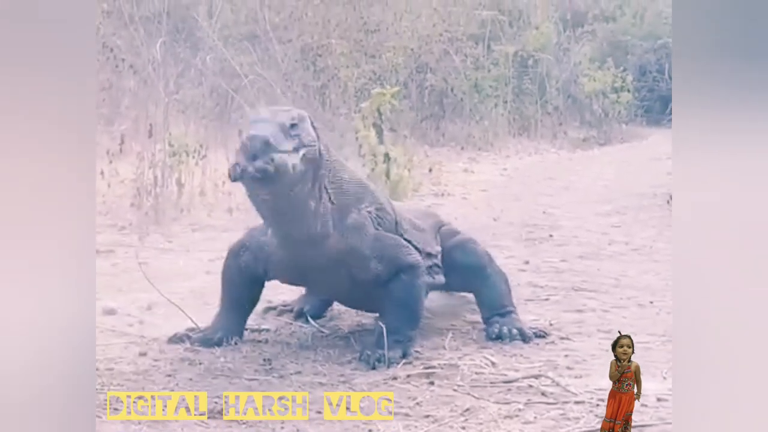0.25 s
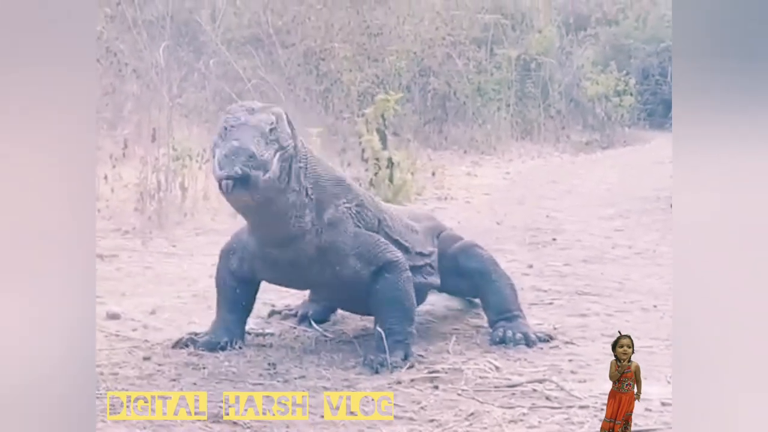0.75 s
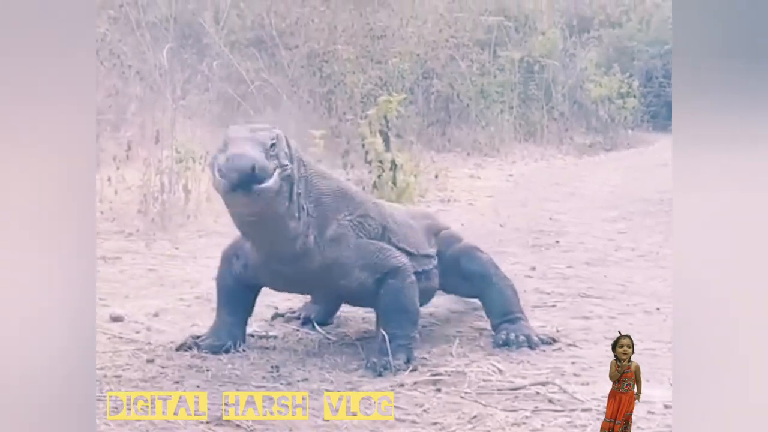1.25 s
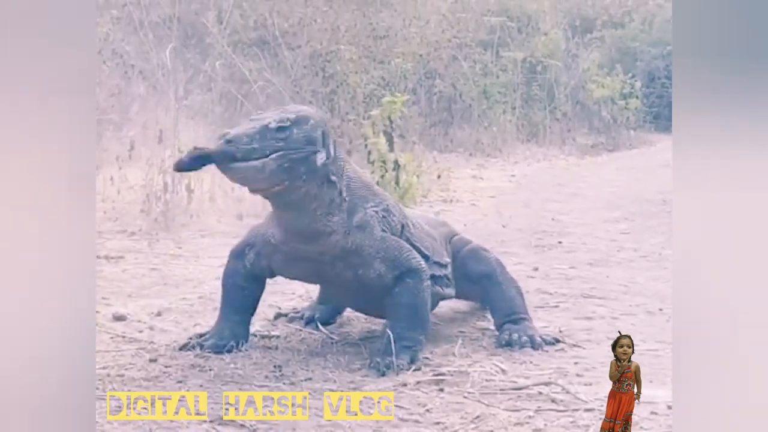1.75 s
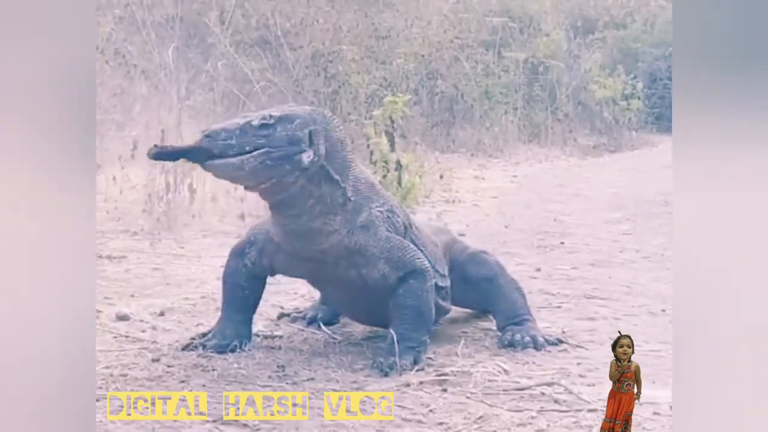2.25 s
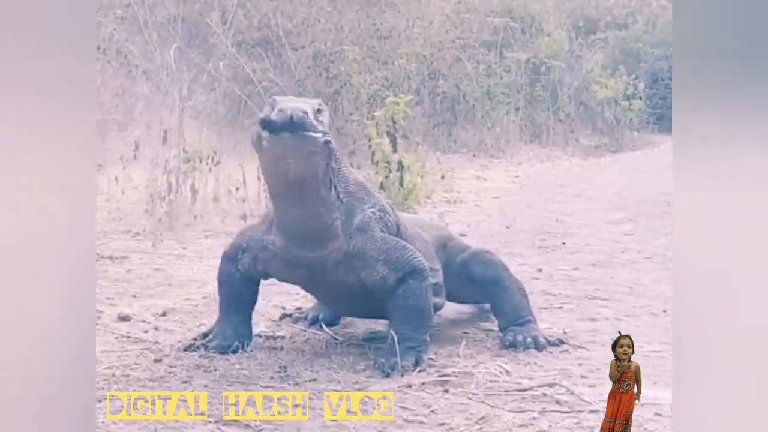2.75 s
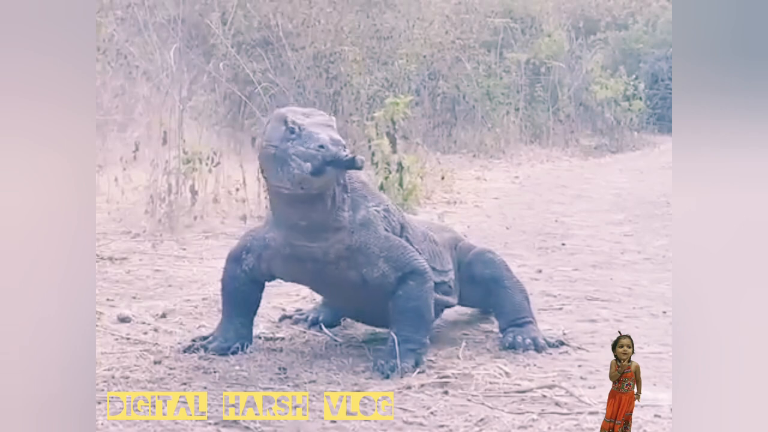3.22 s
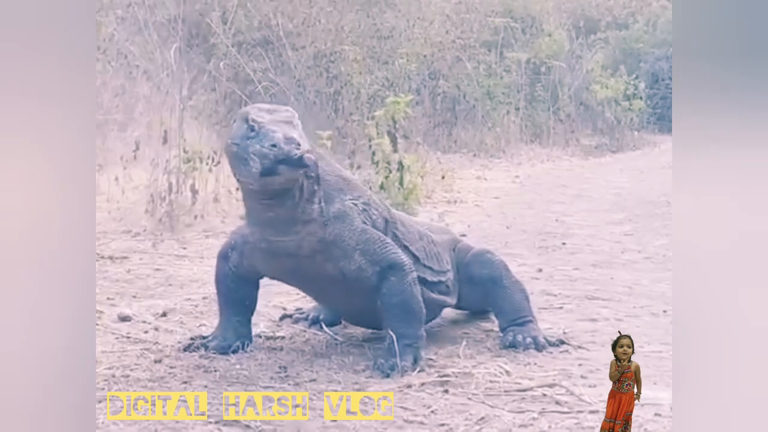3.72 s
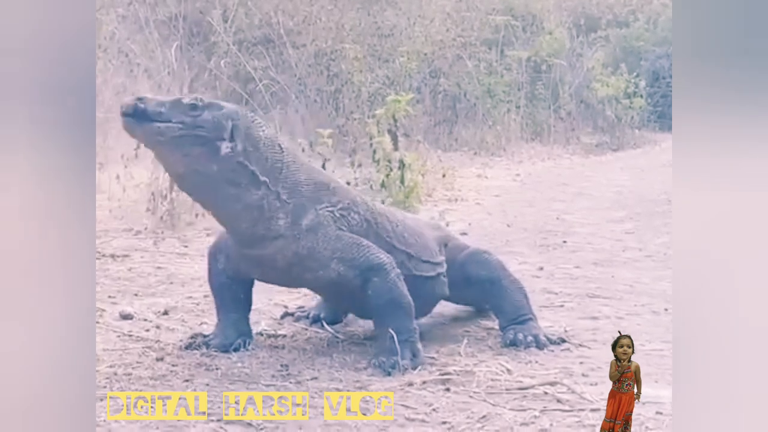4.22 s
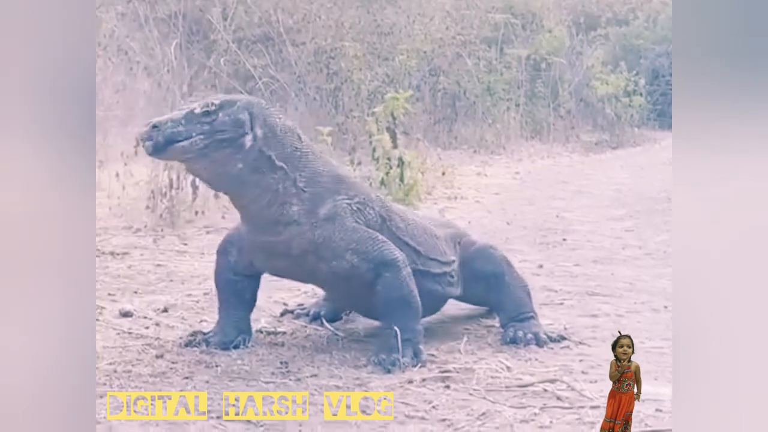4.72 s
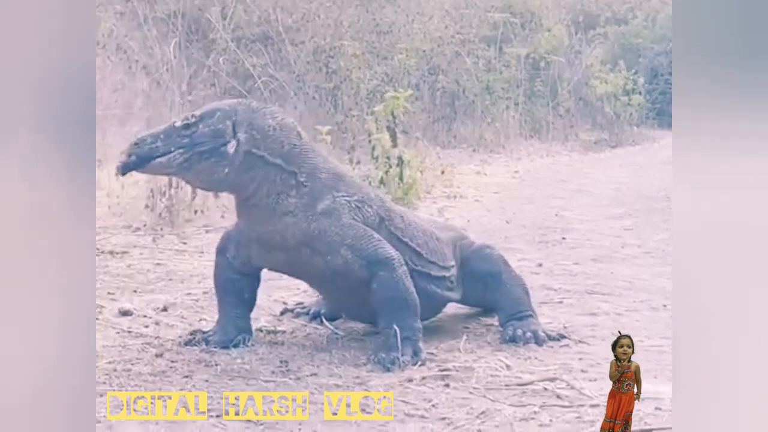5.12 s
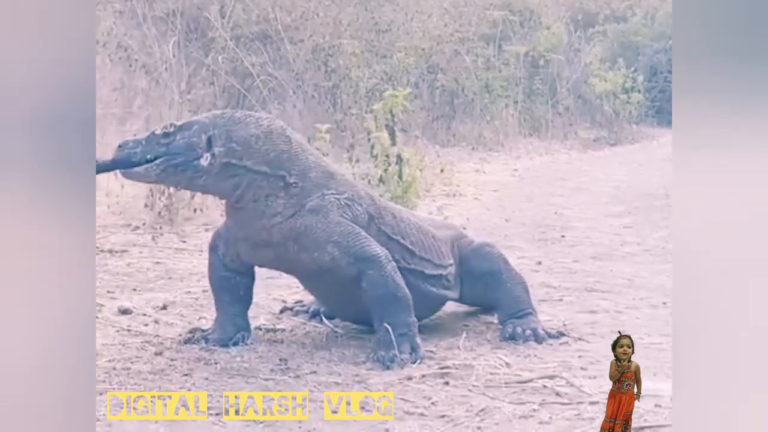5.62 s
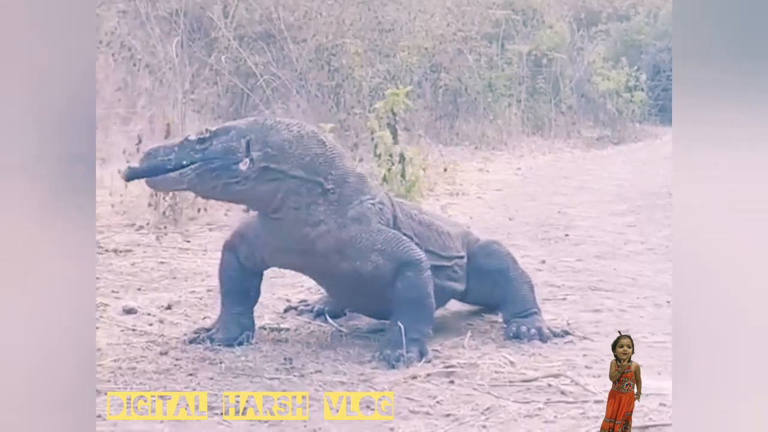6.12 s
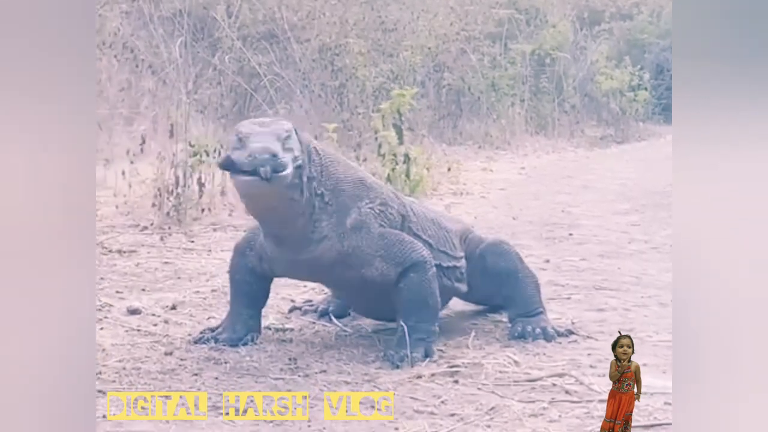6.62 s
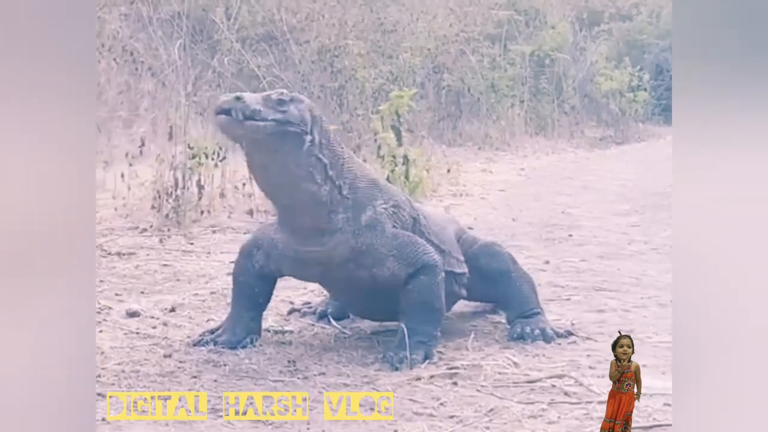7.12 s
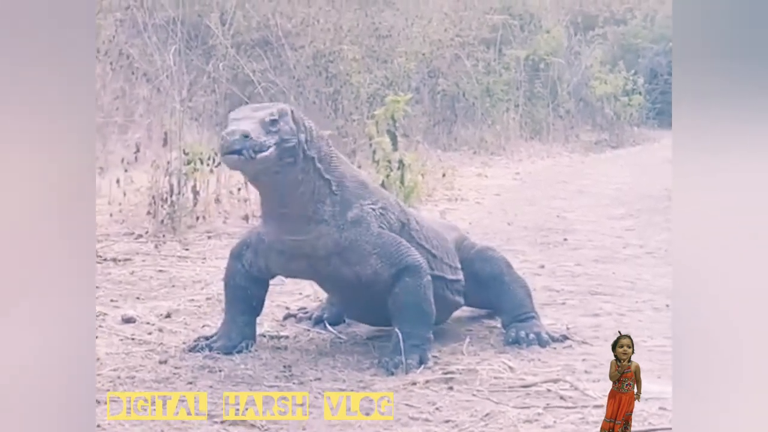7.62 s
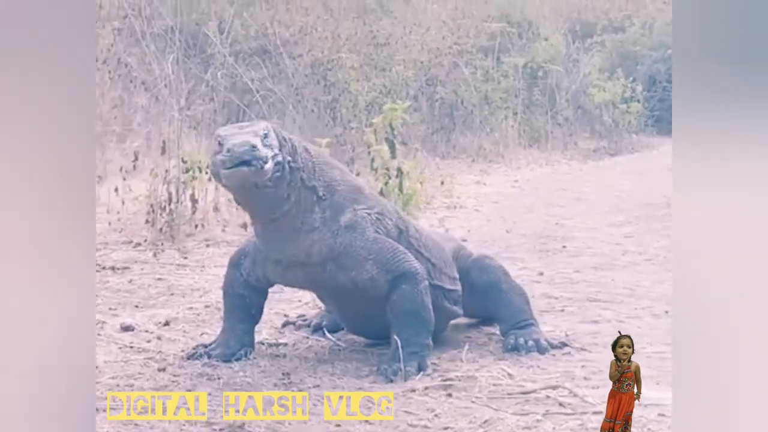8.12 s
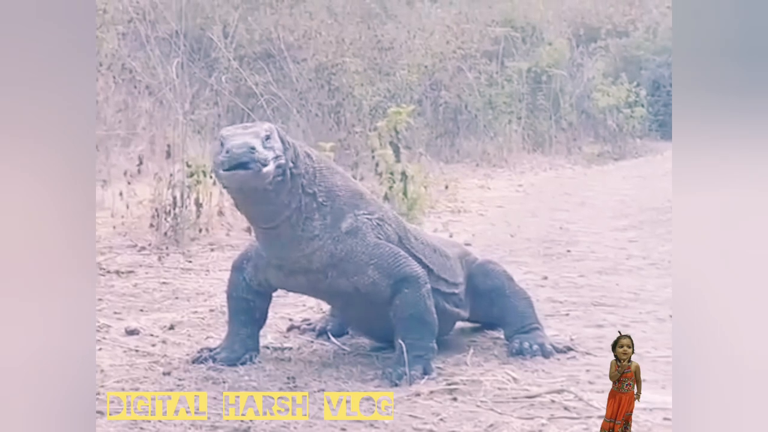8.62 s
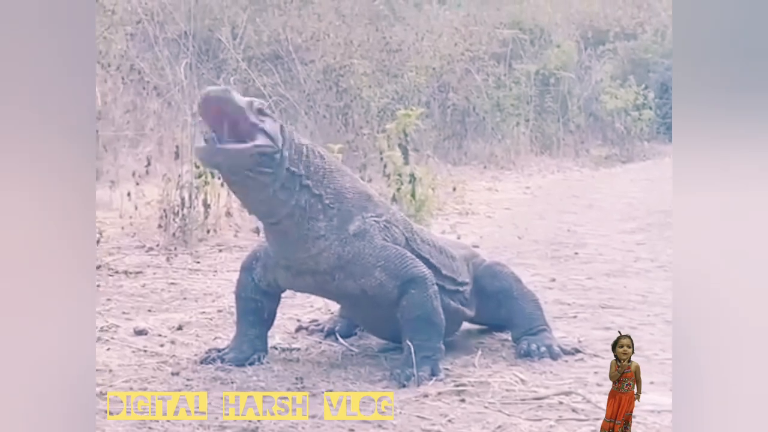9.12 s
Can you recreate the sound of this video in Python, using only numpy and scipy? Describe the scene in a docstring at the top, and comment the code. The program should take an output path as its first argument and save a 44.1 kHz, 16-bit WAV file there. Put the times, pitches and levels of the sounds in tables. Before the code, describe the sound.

The stretch opens mid-cry: a young goat's thin, high bleat drops in pitch within 0.13 s. Dry litter rustles close by with small clicking ticks. From 0.6 to 1.2 s comes the strongest bleat, squeaky at its start and slightly rough; at 0.75 s a stick snaps sharply, with a faint low thump and bright, dense echoes fading away. Short broken cries follow at 1.5-1.8 s amid rustles and a strong tick near 1.9. A weak rising cry runs 2.8-3.3 s as mains hum and dull air rush become stronger and stay. Another bleat leaps up, then sinks, at 4.2-4.8 s. A tiny far bird chirps near 5 and around 8 s. Soft, lower bleats come at 6.4-6.9, 7.3-7.8 and 8.4-8.8 s. Dry scuffs sound at 8.3 and 9.05 s; a smooth hiss swells at 8.75 and fades by 9. Small, slightly hissy stereo microphone outdoors.

```python
"""Young goat bleating near dry litter

A young goat bleats in thin, high cries that weaken, as harmonics shaped by mouth and throat resonances.
Close by, dry litter ticks (short rings) and rustles (grainy noise), and one stick snaps with a bright echo.
A far bird chirps in gliding whistles; late on, a soft hiss of smooth noise swells and fades.
The small two-port microphone also hears mains hum and a dull rush of air, both stronger after about 3 s."""
import sys
import numpy as np
from scipy import signal
from scipy.fft import rfft, irfft, next_fast_len
from scipy.io import wavfile
from scipy.ndimage import uniform_filter1d

SR = 44100
rng = np.random.default_rng(int(sys.argv[2]) if len(sys.argv) > 2 else 0)


def file_out(sig):
    """Save sig as 16-bit WAV at sys.argv[1]."""
    # one column per channel
    cols = np.atleast_2d(sig).T
    # limit, then scale
    lim = np.clip(cols, -1, 1)
    pcm = np.round(lim * 32767).astype(np.int16)
    wavfile.write(sys.argv[1], SR, pcm)


def gain_from_decibels(decibels):
    """Convert decibel values to linear amplitude factors."""
    exponent = np.asarray(decibels, float) / 20
    return 10 ** exponent


N = 412313

# Background hum, low rumble and air rush, one row each. Each row: level before in dB, level after in dB,
# start of the change in seconds, end in seconds. The rush has its times reversed: it steps up at the second.
ROOM_TONE = [(-66, -53, 3.46, 3.83), (-70.5, -59, 2.78, 3.68), (-56.5, -54, 3.24, 3)]
# Harmonics of the mains hum. Each row: multiple of the hum pitch, level in dB.
HUM_ORDERS = [(1, -3), (2, -13), (3, -15), (4, -18.5), (5, -22.5), (6, -20.5)]
# Colour of the air rush. Each row: frequency in Hz, density in dB per Hz.
RUSH_COLOUR = [(47, -33), (80, -4), (123, 1), (146, -7), (233, -7), (603, -13.5), (1010, -20.5),
               (1800, -39.5), (2340, -69.5), (3960, -120)]
# Colour of the microphone's own hiss. Each row: frequency in Hz, density in dB per Hz.
MIC_HISS_COLOUR = [(940, -33.5), (1600, -17), (1880, -2.5), (2260, -3), (3130, -8.5), (7700, -11.5),
                   (9420, -24), (10900, -19.5), (15800, -23.5)]
# The two microphone ports in diffuse sound. Each row: frequency in Hz, side minus mid in dB.
DIFFUSE_PORTS = [(60, -23.5), (150, -8), (380, -11.5), (950, -7.5), (2380, 0), (5980, -29.5), (15000, -4.5)]
# The two microphone ports in the foreground sounds. Each row: frequency in Hz, side minus mid in dB.
NEAR_PORTS = [(60, -23), (250, -12.5), (700, -15.5), (1290, -1), (2380, -17), (4400, -34), (8120, -5.5),
              (15000, -17.5)]

# Far bird chirps. Each row: start in seconds, length in seconds, start pitch in Hz, end pitch in Hz, level in dB.
CHIRPS = [(4.95, .17, 3550, 4100, -86), (7.965, .03, 4200, 3200, -76), (8.175, .035, 4200, 3600, -81)]

# Litter rustle swells. Each row: peak time in seconds, peak level in dB, rise and fall in seconds per 20 dB.
RUSTLE = [(0.14, -71, 0.086, 0.26), (0.42, -64, 0.24, 0.57), (1.2, -69.5, 0.14, 0.52),
          (1.56, -63.5, 0.087, 0.053), (1.885, -67, 0.06, 0.26), (2.7, -68, 0.41, 0.11),
          (4.11, -74.5, 0.023, 0.13), (4.26, -69, 0.33, 0.091), (4.62, -78, 0.22, 0.54), (6.8, -76, .6, 1),
          (7.67, -77.5, 0.17, 0.91), (8.41, -70.5, 0.13, 0.12), (9.045, -68.5, 0.069, 0.46)]
# Colour of the litter. Each row: frequency in Hz, density in dB per Hz.
LITTER_COLOUR = [(880, -0.5), (1500, -1.5), (2170, 2), (4800, -4.5), (9510, -12), (13400, -23),
                 (15500, -38)]
# Short dull scuffs. Each row: peak time in seconds, peak level in dB, rise and fall in seconds per 20 dB.
SCUFFS = [(8.262, -56, 0.038, 0.073), (9.048, -56.5, 0.0056, 0.031)]
# Colour of the scuffs. Each row: frequency in Hz, density in dB per Hz.
SCUFF_COLOUR = [(900, -20), (1400, -0.5), (1900, 5.5), (2500, -3.5), (3200, -4), (6000, -20), (15000, -48)]
# Thin bright rustles, as of dry grass. Each row: peak time in seconds, peak level in dB,
# rise and fall in seconds per 20 dB.
GRASS = [(1.19, -74, .25, 0.22), (1.55, -68.5, 0.035, 0.32), (2.385, -74.5, .02, 0.04)]
# Colour of the grassy rustles. Each row: frequency in Hz, density in dB per Hz.
GRASS_COLOUR = [(4000, -19), (8000, 2.5), (15000, -3)]
# Level curve of the long soft hiss. Each row: time in seconds, level in dB.
LONG_HISS = [(8.52, -81), (8.746, -57.5), (8.876, -59.5), (9.0, -71)]
# Colour of the long hiss. Each row: frequency in Hz, density in dB per Hz.
LONG_HISS_COLOUR = [(880, -7), (1500, -1.5), (2400, -0.5), (4200, -6.5), (5670, -13), (7210, -9),
                    (8180, -14), (15000, -30.5)]

# The clearest litter ticks. Each row: start in seconds, strength in dB, ringing pitch in Hz,
# crack over the ring in dB.
TICKS = [(0.2035, -42, 2580, -21), (0.3546, -41, 2640, -16), (0.4196, -42.5, 2200, -2.5),
         (0.5796, -33, 2190, -4.5), (1.433, -51, 2300, -2), (1.537, -42.5, 7600, -1.5),
         (1.76, -33.5, 1420, -18.5), (1.8678, -26.5, 2430, -12), (1.994, -49, 2610, -10),
         (2.061, -52, 2680, -1.5), (2.178, -55, 3000, 0), (2.7173, -32.5, 3320, -12),
         (2.749, -31.5, 2500, -10.5), (2.809, -45, 3000, -17), (2.8386, -48, 2820, -0.5),
         (3.088, -50, 4500, -9.5), (3.9824, -45, 3250, -7), (4.1634, -43, 1790, -20),
         (7.664, -47, 4740, -13), (7.6849, -42.5, 3120, -23), (7.732, -44, 1800, -22)]

# The snap and its splinters. Each row: peak time in seconds, relative burst strength in dB.
SNAP = [(.7484, -2), (.7512, -15), (.7575, -25), (.7612, -22), (.7635, -19)]
# Brief modes of the stick. Each row: frequency in Hz, relative strength in dB, 60 dB decay in seconds.
STICK_MODES = [(3400, -22, 0.00075), (4800, -7.5, 0.0014), (5752, 1.5, 0.0029), (6800, -4.5, .002),
               (8000, -6.5, .002), (9600, -6.5, 0.004), (12600, -15, 0.0011)]
# Low thump after the snap. One row: start in seconds, frequency in Hz, strength in dB before its soft onset,
# 60 dB decay in seconds.
THUMP = (.7512, 205, -30, .05)
# Colour of the snap's echoes. Each row: frequency in Hz, density in dB per Hz.
ECHO_COLOUR = [(2500, -26), (5000, -7), (7500, 0.5), (11000, -6), (15000, -9.5)]

# One short curve per held note of the goat. Each row: time in seconds, pitch in Hz, mouth resonance level in dB,
# mouth resonance in Hz, upper throat level in dB.
NOTES = [
    [(0.0, 874, -53.5, 2100, -53), (0.06, 842, -51.5, 2230, -58), (0.105, 797, -51, 2040, -68),
     (0.13, 650, -53, 1740, -78)],
    [(0.59, 736, -59, 1800, -65), (0.72, 910, -50.5, 1900, -61.5), (0.78, 979, -56, 2010, -78),
     (0.915, 882, -44.5, 1740, -55), (1.05, 829, -45, 2030, -50.5), (1.102, 833, -41.5, 2050, -54),
     (1.122, 875, -48.5, 2280, -45), (1.172, 796, -51, 1860, -62)],
    [(1.168, 532, -50, 2180, -56), (1.215, 460, -62, 2000, -70)],
    [(1.48, 503, -74, 2190, -93), (1.515, 563, -54, 2250, -76.5), (1.545, 595, -74, 2280, -71)],
    [(1.53, 827, -61.5, 1680, -74), (1.58, 877, -61, 1850, -71)],
    [(1.57, 738, -53.5, 2160, -75), (1.68, 736, -63, 1960, -69), (1.765, 758, -77, 1710, -61),
     (1.84, 667, -83, 2100, -68)],
    [(2.765, 494, -73.5, 2090, -88.5), (2.82, 667, -67, 1900, -89), (2.87, 721, -67.5, 1500, -87),
     (2.972, 719, -68.5, 1440, -85)],
    [(2.972, 933, -68, 1890, -85), (2.995, 960, -59, 1850, -90), (3.09, 957, -58.5, 1943, -87),
     (3.23, 863, -71, 1960, -82)],
    [(3.235, 1010, -66.5, 2050, -87.5), (3.305, 830, -80, 1910, -91)],
    [(4.185, 497, -68.5, 1500, -80), (4.21, 549, -70, 1700, -74), (4.245, 592, -60.5, 1400, -83.5),
     (4.282, 650, -59, 1610, -82)],
    [(4.283, 920, -52.5, 1800, -79), (4.32, 919, -50, 1800, -64), (4.43, 916, -55, 1840, -60.5),
     (4.52, 899, -62, 1740, -59), (4.625, 845, -67.5, 2370, -76), (4.74, 813, -63.5, 1617, -93),
     (4.848, 704, -72.5, 1535, -92.5)],
    [(6.355, 484, -74.5, 2080, -83), (6.395, 557, -63, 2145, -95), (6.43, 623, -75.5, 1860, -97.5),
     (6.475, 628, -59.5, 2370, -72), (6.54, 640, -68, 2210, -81.5), (6.65, 646, -70, 2170, -77),
     (6.757, 621.4, -59, 2470, -72.5), (6.86, 590, -58, 2330, -65.5), (6.915, 542, -54, 1950, -71),
     (6.952, 488, -59, 1910, -92.5)],
    [(7.268, 498, -73.5, 2080, -91), (7.29, 558, -62.5, 2225, -91.5), (7.315, 625, -72, 1950, -81),
     (7.375, 680, -65, 1770, -79), (7.5, 662, -64.5, 1780, -80.5), (7.56, 655, -88, 1990, -93),
     (7.69, 634, -78.5, 1887, -96), (7.79, 604, -86.5, 1850, -95)],
    [(8.39, 500, -64.5, 2206, -88.5), (8.42, 586, -71, 2240, -88), (8.45, 630, -79, 2130, -86),
     (8.49, 671, -57.5, 2080, -83), (8.58, 669, -52.5, 2020, -77), (8.7, 626, -69, 1950, -72.5),
     (8.85, 577, -83, 1914, -91)],
]
# The voice of each note. Each row: fundamental level in dB, mouth width in Hz, upper throat resonance in Hz
# at the start and at the end, throat width in Hz.
VOICES = [(-53.5, 610, 4100, 4460, 770), (-61, 550, 3700, 4300, 870), (-77, 700, 4700, 4300, 860),
          (-84, 170, 4000, 3900, 540), (-74, 400, 5100, 4300, 820), (-66.5, 440, 5400, 1540, 1500),
          (-94, 910, 5600, 3900, 1500), (-74, 670, 4500, 2500, 2400), (-90, 350, 2600, 3400, 900),
          (-66, 1300, 3400, 4200, 450), (-79, 700, 3950, 2800, 790), (-53, 440, 3900, 5250, 1900),
          (-68.5, 490, 3100, 2500, 1300), (-64, 350, 3000, 5300, 1200)]
# Breath in each note. Each row: added hoarse share 0-1 at the start, the same as it breaks off, haze level in dB.
BREATH = [(0, .02, -74), (.1, .02, -74), (.04, .05, -76), (.03, .1, -82), (.3, .5, -74), (0, .05, -84),
          (.05, 0, -86), (.03, .08, -83), (0, .1, -86), (0, .05, -88), (0, .06, -86), (.01, .012, -81),
          (.02, .1, -86), (.03, .05, -84)]
# The voice catches and turns hoarse for a moment. Each row: centre in seconds, half length in seconds, depth 0-1.
CATCHES = [(.69, .035, .3), (.86, .045, .28), (1.14, .012, .12), (3.18, .07, .3), (4.58, .035, .3),
           (7.51, .025, .35)]
# Brief thin squeaking tones heard within the goat's cries. Each row: start in seconds, length in seconds,
# start pitch in Hz, end pitch in Hz, rms level in dB.
SQUEAKS = [(0.0, 0.089, 2390, 2240, -55.5), (0.595, 0.039, 2050, 2350, -51.5),
           (6.725, 0.132, 2220, 2067, -63.5)]


def rms_one(x):
    """Scale to unit rms."""
    return x / np.sqrt(np.mean(x ** 2) + 1e-20)


def drift(hz, size=N):
    """Slow random wander of spread 1: noise through two equal low-pass poles at hz."""
    pole = np.exp(-2 * np.pi * hz / SR)
    noise = rng.standard_normal(size + SR // 2)
    slow = signal.lfilter([1], [1, -2 * pole, pole * pole], noise)[SR // 2:]
    return rms_one(slow - slow.mean())


def coloured(x, spectrum, turn=1):
    """Shape sound to a spectrum; turn = 1j shifts it a quarter cycle."""
    size = next_fast_len(N)
    hz = np.maximum(np.arange(size // 2 + 1) * SR / size, 1)
    point_hz, point_db = np.transpose(spectrum)
    gain = gain_from_decibels(np.interp(np.log(hz), np.log(point_hz), point_db))
    return irfft(turn * rfft(x, size) * gain, size)[..., :N]


def played(rows, fade_s=0.0051):
    """The samples of a curve, a soft on-off gate and its columns."""
    s, *columns = np.transpose(rows)
    span = np.arange(max(round(s[0] * SR), 0), min(round(s[-1] * SR), N))
    t = span / SR
    since_start = t - s[0] + (s[0] < 0.005)     # a sound at the very start has no fade-in
    gate = np.clip(np.minimum(since_start, s[-1] - t) / fade_s, 0, 1)
    return span, gate, [np.interp(t, s, c) for c in columns]


def whistles(rows, grain, grain_hz):
    """Gliding sines with an unsteady height."""
    out = np.zeros(N)
    for s, length, start_hz, end_hz, db in rows:
        span, gate, (hz,) = played([(s, start_hz), (s + length, end_hz)])
        tone = np.sin(2 * np.pi * np.cumsum(hz) / SR)
        out[span] += gate * gain_from_decibels(db) * tone * (1 + grain * drift(grain_hz, size=len(span)))
    return out


def swells(gain, spectrum, grain_db):
    """Noise of uneven grain under a level curve."""
    grains = rng.standard_normal(N) * gain_from_decibels(grain_db * drift(43))
    return gain * rms_one(coloured(grains, spectrum))


def stereo_noise(spectrum):
    """Diffuse noise: the ports share most of it, a little out of phase; the rest is their own."""
    own_share = 0.27     # part of the ports' difference that is unrelated noise
    mid, own = coloured(rng.standard_normal((2, N)), spectrum)
    difference = np.sqrt(1 - own_share) * mid + np.sqrt(own_share) * own
    side = coloured(difference, DIFFUSE_PORTS, turn=1j)
    return (mid + side * [[1], [-1]]) / np.std(mid)


def room_tone():
    """Mains hum wavering slightly, a dull rush of air, and the microphone's own hiss."""
    hum_hz, hum_waver_db = 59.54, 2.2
    air_gust_db, mic_hiss_db = 1.2, -82.5
    t = np.arange(N) / SR
    hum_db, rumble_db, rush_db = [np.interp(t, [t0, t1], [before, after])
                                  for before, after, t0, t1 in ROOM_TONE]
    phase = 2 * np.pi * np.cumsum(hum_hz + 0.5 * drift(2)) / SR
    hum = sum(gain_from_decibels(db + hum_waver_db * drift(12)) * np.cos(k * phase) for k, db in HUM_ORDERS)
    air = stereo_noise(RUSH_COLOUR) * gain_from_decibels(air_gust_db * drift(7.9))
    rumble = signal.sosfiltfilt(signal.butter(1, 550, fs=SR, output="sos"), air)
    moving_air = gain_from_decibels(rumble_db) * rumble + gain_from_decibels(rush_db) * (air - rumble)
    return np.sqrt(2) * gain_from_decibels(hum_db) * hum + moving_air + gain_from_decibels(mic_hiss_db) * stereo_noise(MIC_HISS_COLOUR)


def bird():
    """Far off: short, grainy gliding whistles."""
    return whistles(CHIRPS, grain=0.79, grain_hz=120)


def litter_moving(rows):
    """Gain of a rustle: each swell rises and falls evenly in dB."""
    t = np.arange(N) / SR
    return sum(gain_from_decibels(db - 20 * np.abs(t - s) / np.where(t < s, rise, fall)) for s, db, rise, fall in rows)


def rustle():
    """Litter, scuffs and grass rustle as noise in clumped grains."""
    litter = swells(litter_moving(RUSTLE), LITTER_COLOUR, grain_db=3.0)
    scuffs = swells(litter_moving(SCUFFS), SCUFF_COLOUR, grain_db=4.0)
    grass = swells(litter_moving(GRASS), GRASS_COLOUR, grain_db=2.5)
    return litter + scuffs + grass


def long_hiss():
    """Smooth noise under a level curve that swells and fades."""
    span, gate, (db,) = played(LONG_HISS, fade_s=0.02)
    gain = np.zeros(N)
    gain[span] = gate * gain_from_decibels(db)
    return swells(gain, LONG_HISS_COLOUR, grain_db=0.5)


def small_ticks():
    """Rows of faint ticks, falling by chance and more often where the litter moves."""
    most_per_s, base_db, spread_db, crack_db = 25, -60, 3, -6
    when, chance, size, tone = rng.random((4, 250))
    busy = litter_moving(RUSTLE)[(when * N).astype(int)] ** 0.75
    kept = chance < most_per_s * N / SR / len(when) * busy / busy.max()
    strength_db = base_db - spread_db * np.log(size + 0.074)
    rows = np.transpose([when * N / SR, strength_db, 1800 * 2.5 ** tone, crack_db + 0 * tone])
    return rows[kept]


def ticks():
    """Each tick of the litter is a short ring with a bright crack on top."""
    out, t = np.zeros(N + SR), np.arange(SR // 50) / SR
    bright_band = signal.butter(2, [3500, 8000], "band", fs=SR, output="sos")
    for s, strength_db, hz, crack_db in [*TICKS, *small_ticks()]:
        body = np.sin(2 * np.pi * hz * t) * np.exp(-t / 0.00073) * (1 - np.exp(-t / 0.0006))
        crack = signal.sosfilt(bright_band, rng.standard_normal(len(t))) * np.exp(-t / 0.0013)
        out[round(s * SR):][:len(t)] += gain_from_decibels(strength_db) * (body + gain_from_decibels(crack_db) * crack)
    return signal.sosfilt(signal.butter(4, 1300, "high", fs=SR, output="sos"), out[:N])


def ring(clicks, hz, t60):
    """A two-pole resonator: a unit click sets a decaying sine of height 1 ringing."""
    r, w = gain_from_decibels(-60 / (t60 * SR)), 2 * np.pi * hz / SR
    return signal.lfilter([0, np.sin(w)], [1, -2 * r * np.cos(w), r * r], clicks + 1e-18)


def snap():
    """Every splinter is a short tearing burst into the stick's brief modes; a soft low thump follows."""
    t, tearing = np.arange(N) / SR, rng.standard_normal(N)
    bursts = sum(gain_from_decibels(db) * np.exp(-np.abs(t - s) / np.where(t < s, 0.0002, 0.0013)) for s, db in SNAP)
    crack = sum(gain_from_decibels(db - 20) * ring(tearing * bursts, hz, t60) for hz, db, t60 in STICK_MODES)
    crack = signal.sosfilt(signal.butter(2, 2900, "high", fs=SR, output="sos"), crack)
    s, hz, db, t60 = THUMP
    since = np.maximum(t - s, 0)
    thump_height = gain_from_decibels(db - 60 * since / t60) * (1 - np.exp(-250 * since))
    return crack + np.sin(2 * np.pi * hz * since) * thump_height


def echoes():
    """The snap scatters back as a dense bright hiss: a short gap, a quick fall, then a thin lingering tail."""
    level_db, t60_s, arrives_s = -37, 0.36, 0.0094
    late_db, late_t60_s = -21, 0.82     # the tail, relative to the bulk
    t = np.maximum(np.arange(N) / SR - SNAP[0][0], 0)
    fall = gain_from_decibels(-60 * t / t60_s) + gain_from_decibels(late_db - 60 * t / late_t60_s)
    arrival = np.clip(t / arrives_s, 0, 1) ** 2
    return swells(gain_from_decibels(level_db) * fall * arrival, ECHO_COLOUR, grain_db=2.0)


def resonance(hz, centre_hz, width_hz):
    """Gain of a cavity across the harmonics; steep skirts keep the valleys dark."""
    shape = 1 / (1 + ((hz - centre_hz) / width_hz) ** 2) ** 2
    return shape / np.sqrt(np.sum(shape ** 2, axis=0))


def escaping_air(throat_hz, throat_width_hz, size):
    """Air escaping past the folds: noise around the upper throat resonance."""
    reach_hz = 1.1 * throat_width_hz
    edges = [max(throat_hz - reach_hz, 1500), throat_hz + reach_hz]
    band = signal.butter(2, edges, "band", fs=SR, output="sos")
    return rms_one(signal.sosfilt(band, rng.standard_normal(size)))


def bleat(rows, voice, breath):
    """Steady vocal folds give clean harmonics; mouth and throat pick the loud ones, hoarseness smears them."""
    low_db, mouth_width_hz, throat_hz, throat_end_hz, throat_width_hz = voice
    at_start, at_end, haze_db = breath
    clear, settle_s, break_s = 0.006, 0.17, 0.06     # hoarse share of a held note; clearing and cracking times
    flutter_db_per_order, fundamental_fade_s = 0.5, 0.029
    half_lines, beat_cycles = 1.3, 6     # in a catch, strength of the slower beats; one long beat in six cycles
    k = np.arange(2, 14)[:, None]     # harmonics above the fundamental
    span, gate, (pitch, mouth_db, mouth_hz, throat_db) = played(rows)
    size = len(span)
    since = np.arange(size) / SR

    rough = clear + at_start * np.exp(-since / settle_s) + at_end * np.exp(-since[::-1] / break_s)
    caught = sum(depth * np.exp(-((span / SR - s) / half) ** 2) for s, half, depth in CATCHES)
    rough = np.minimum(rough + caught ** 2, 0.9)

    # the folds glide, they do not turn corners
    pitch = uniform_filter1d(pitch, size=SR // 55, mode="nearest")
    phase = 2 * np.pi * np.cumsum(pitch * (1 + 0.008 * drift(40, size=size))) / SR
    throat_glide_hz = np.linspace(throat_hz, throat_end_hz, size)
    mouth = gain_from_decibels(mouth_db) * resonance(k * pitch, mouth_hz, mouth_width_hz)
    throat = gain_from_decibels(throat_db) * resonance(k * pitch, throat_glide_hz, throat_width_hz)

    # high harmonics come and go, and uneven cycles blur them first
    flutter = np.array([gain_from_decibels(flutter_db_per_order * order * drift(8.7, size=size)) for order in k[:, 0]])
    clean = (1 - rough) ** (k ** 2 / 6)
    smear = np.sqrt(clean) + np.sqrt(1 - clean) * np.array([drift(270, size=size) for _ in k])
    upper = np.sum((mouth + throat) * flutter * smear * np.sin(k * phase + k ** 2), axis=0)
    # in a catch every second cycle is weaker and the voice beats slowly
    upper *= 1 + half_lines * caught * (np.cos(phase / 2) + 2 * np.cos(phase / beat_cycles))

    haze = gain_from_decibels(haze_db + 2 * drift(16, size=size)) * escaping_air(throat_hz, throat_width_hz, size)
    low_gate = played(rows, fundamental_fade_s)[1]
    low = low_gate * (gain_from_decibels(low_db) * np.sin(phase) + haze)
    return span, np.sqrt(2) * (low + gate * upper)


def goat():
    """The bleated notes in turn, with brief thin squeaks over some of them."""
    out = np.sqrt(2) * whistles(SQUEAKS, grain=0.3, grain_hz=150.24)
    for rows, voice, breath in zip(NOTES, VOICES, BREATH):
        span, note = bleat(rows, voice, breath)
        out[span] += note
    return out


def scene():
    """Foreground sounds over the room tone; the ports hear them a little out of phase."""
    near = bird() + rustle() + long_hiss() + ticks() + snap() + echoes() + goat()
    side = coloured(near, NEAR_PORTS, turn=1j)
    return near + side * [[1], [-1]] + room_tone()


def top_cut(x):
    """Nothing passes above the cut-off."""
    return signal.sosfilt(signal.butter(12, 15600, fs=SR, output="sos"), x)


def record(dry):
    """A steep low-pass filter cuts the top of what the microphone hears."""
    mix = signal.sosfilt(signal.butter(12, 15200, fs=SR, output="sos"), dry)
    return top_cut(mix)


dry = scene()
out = record(dry)
file_out(out)
```